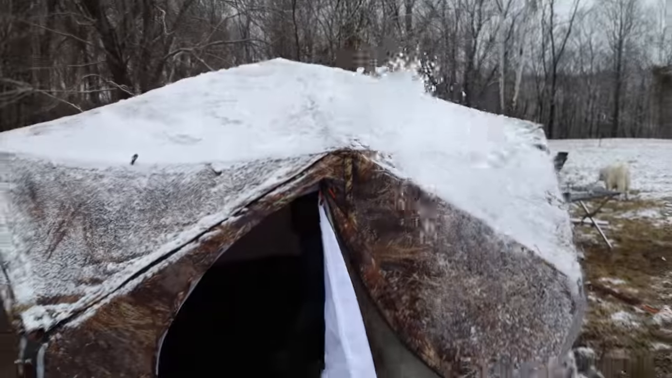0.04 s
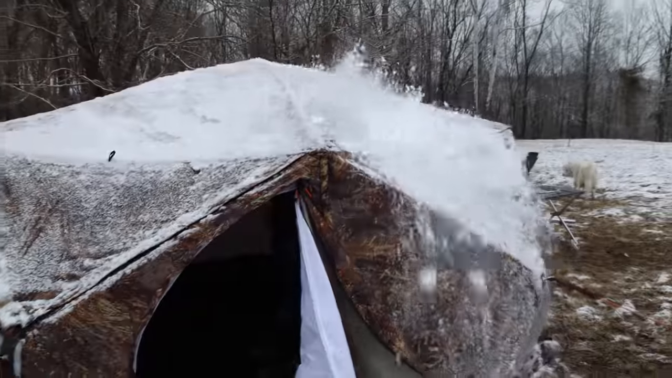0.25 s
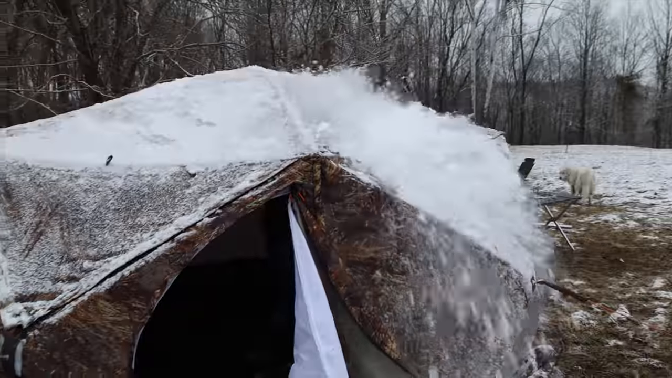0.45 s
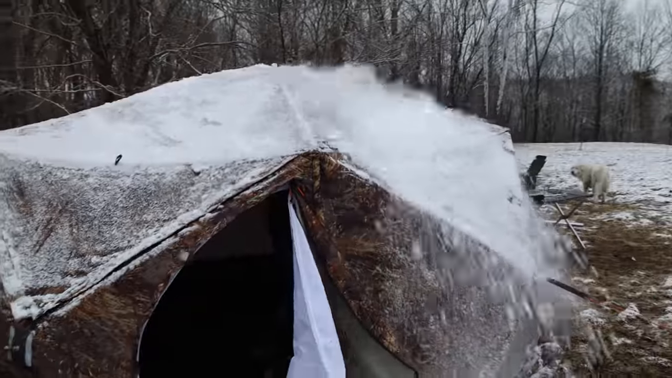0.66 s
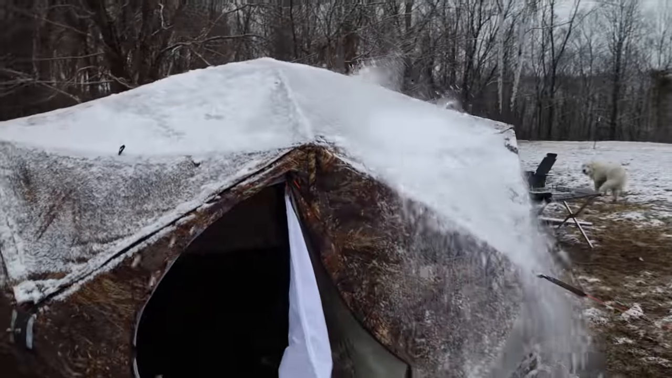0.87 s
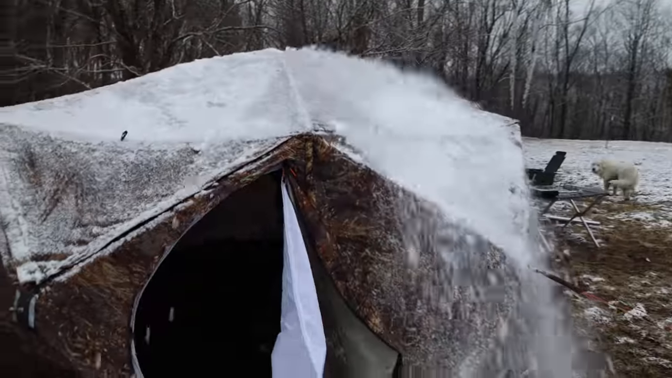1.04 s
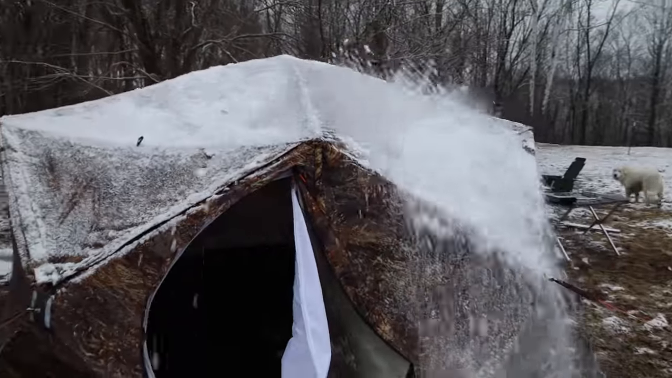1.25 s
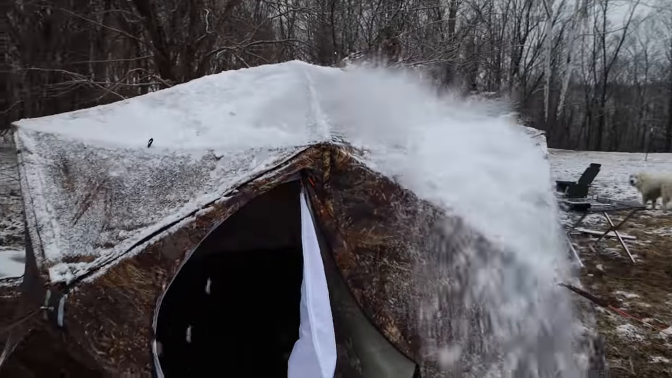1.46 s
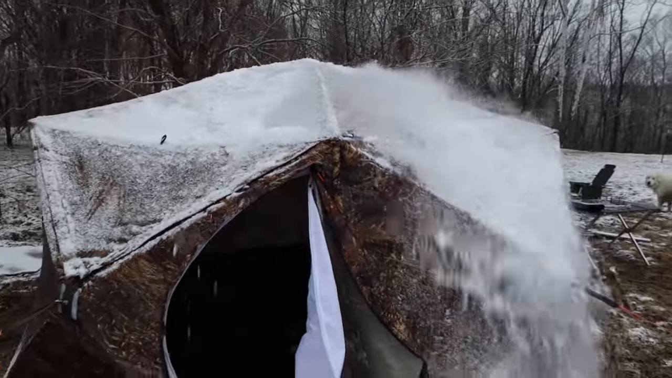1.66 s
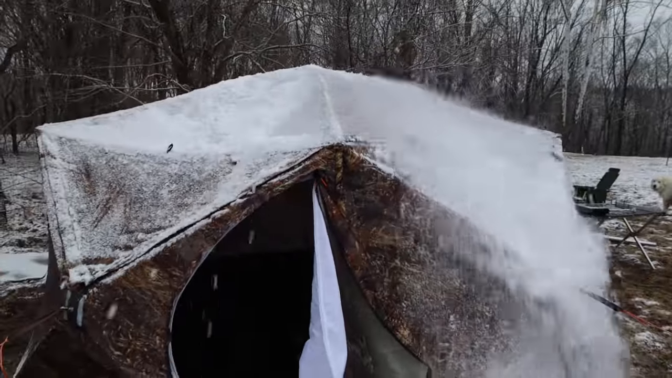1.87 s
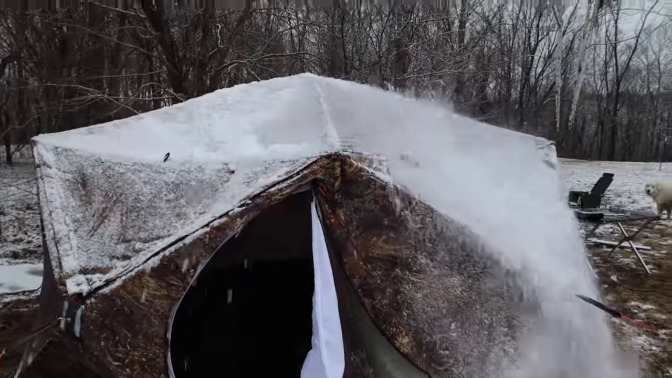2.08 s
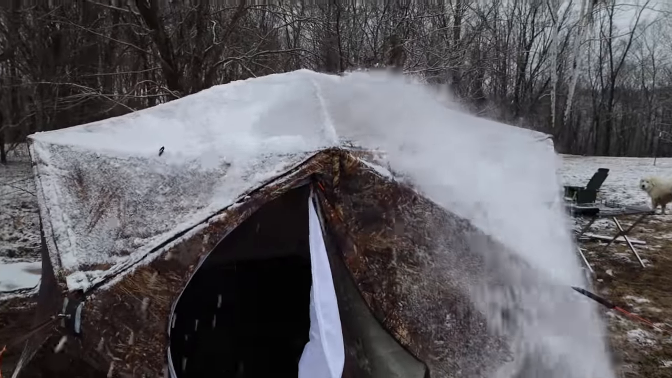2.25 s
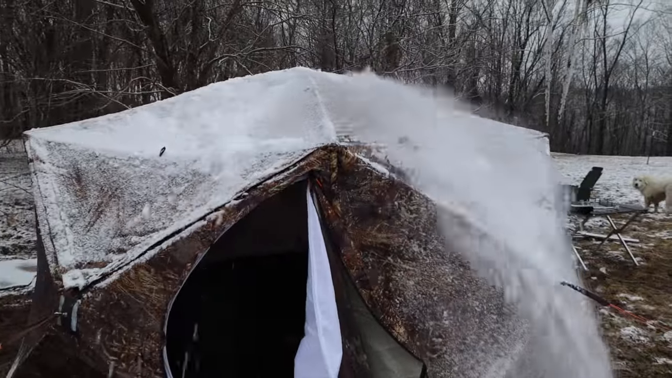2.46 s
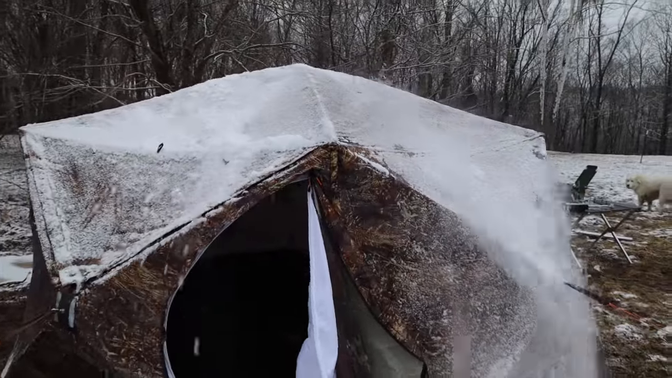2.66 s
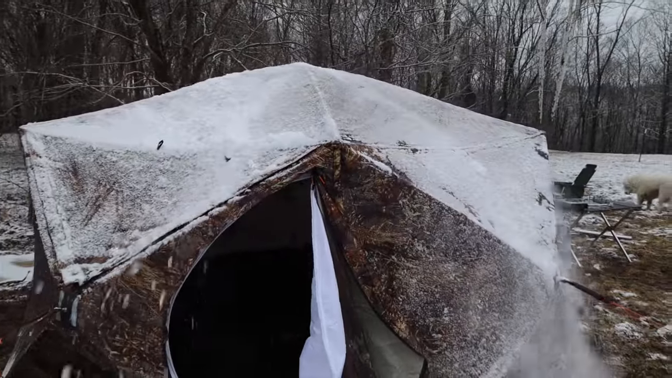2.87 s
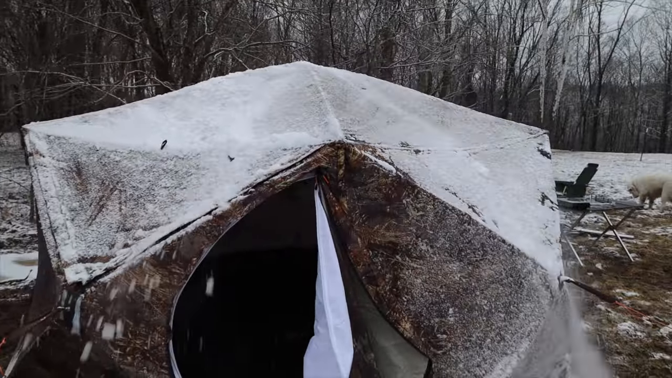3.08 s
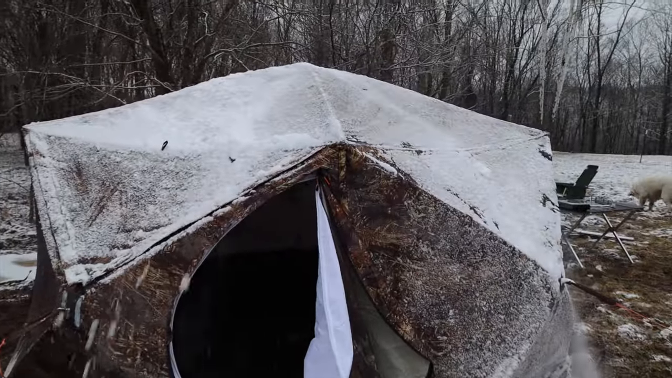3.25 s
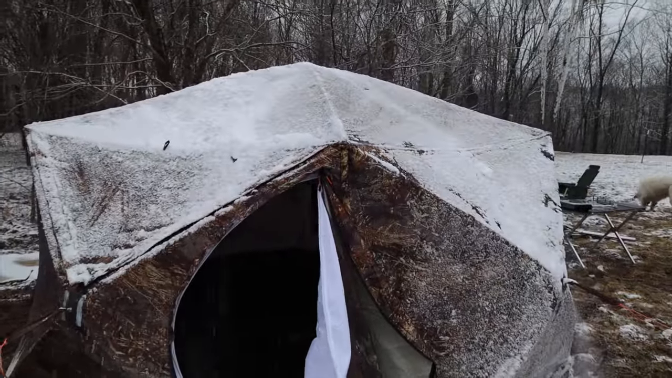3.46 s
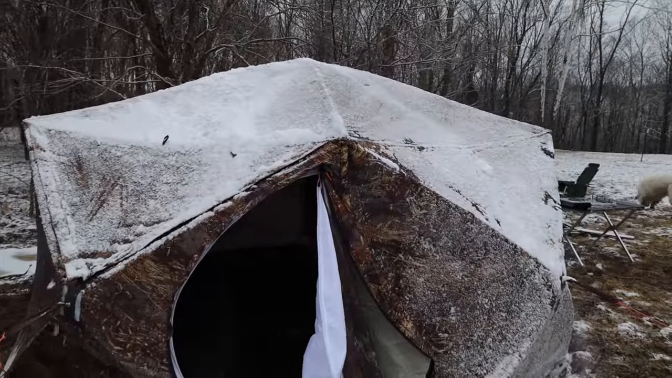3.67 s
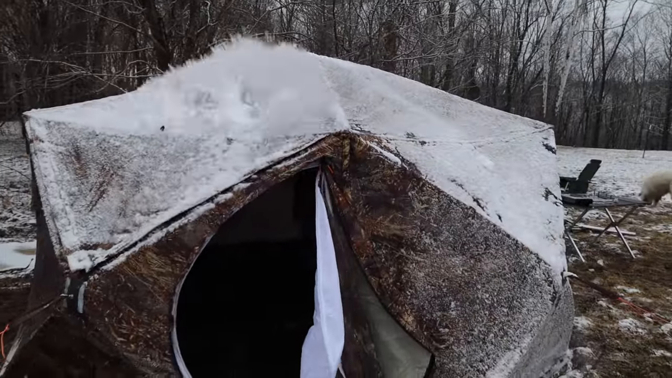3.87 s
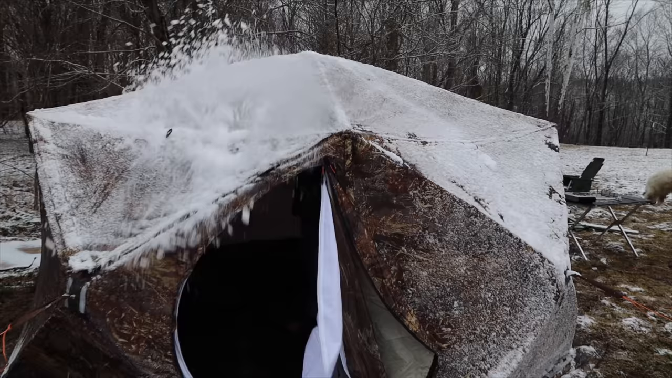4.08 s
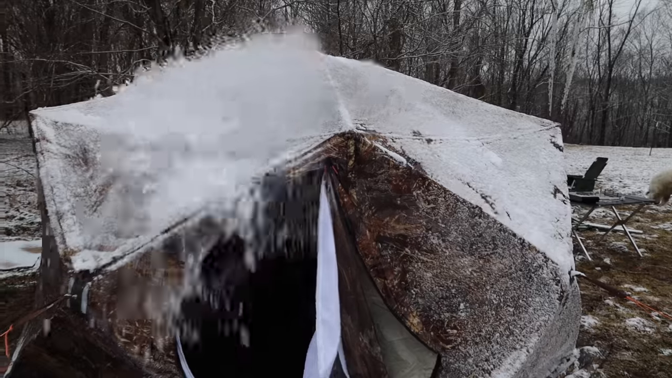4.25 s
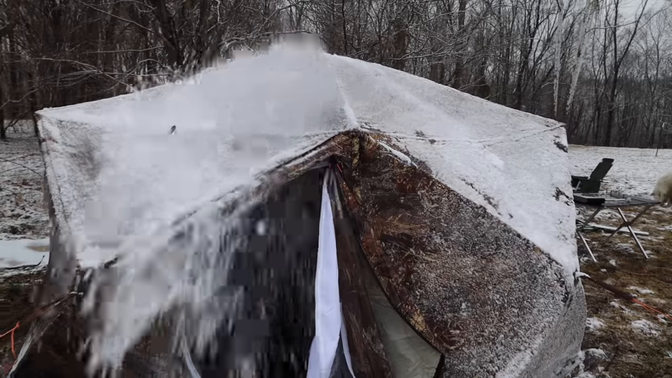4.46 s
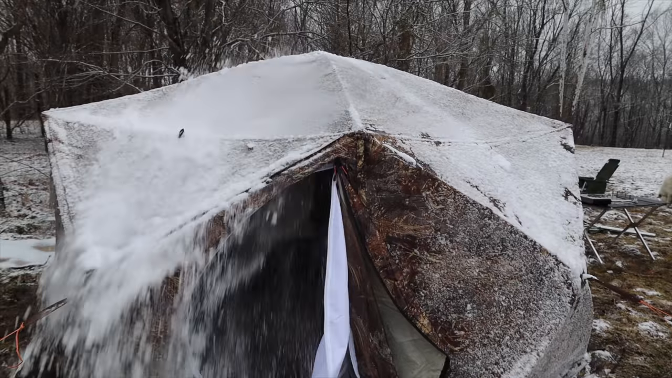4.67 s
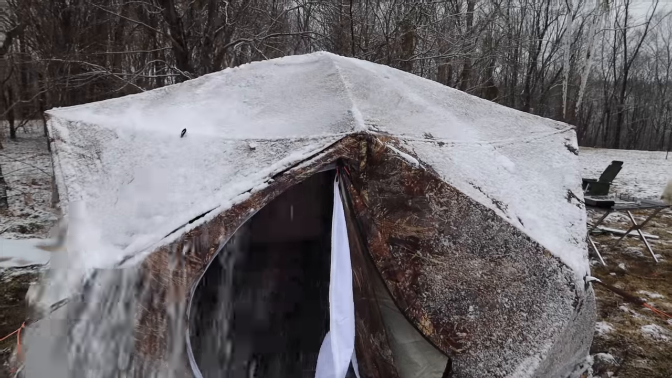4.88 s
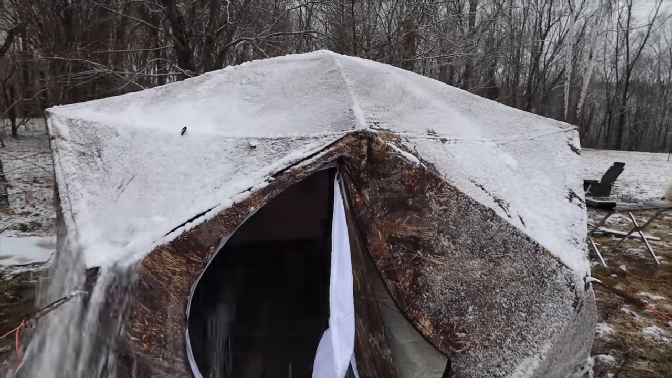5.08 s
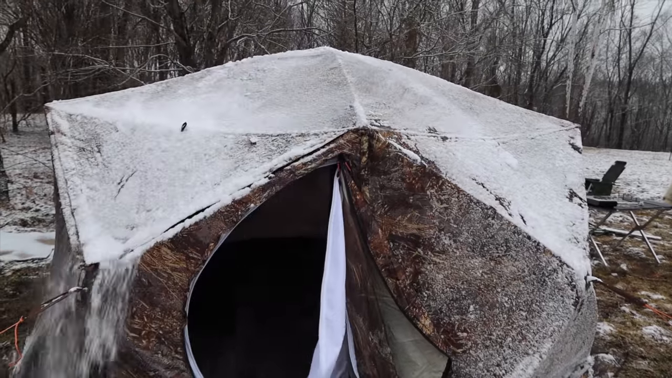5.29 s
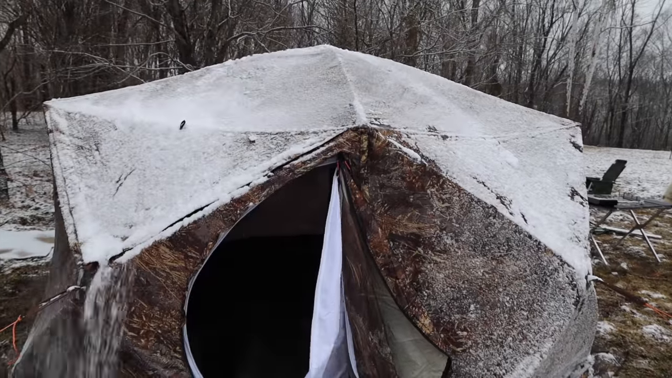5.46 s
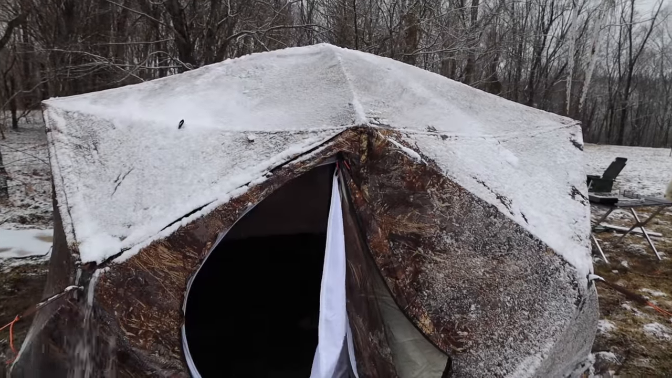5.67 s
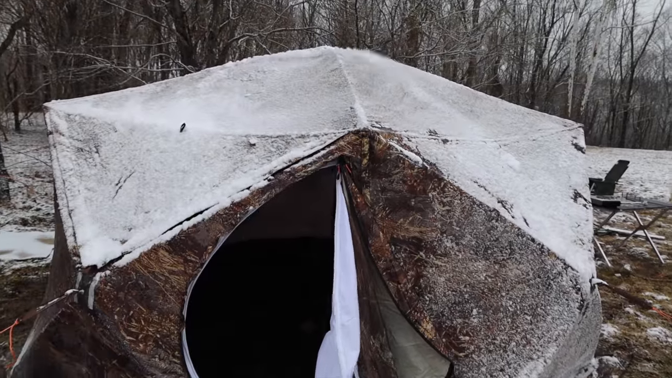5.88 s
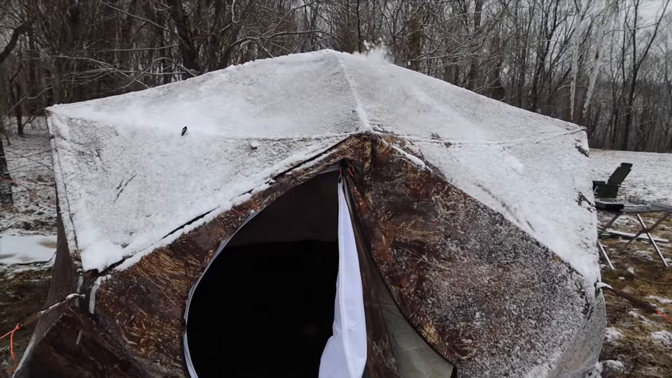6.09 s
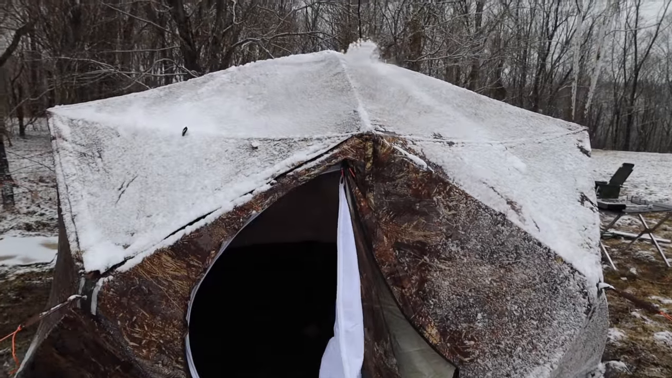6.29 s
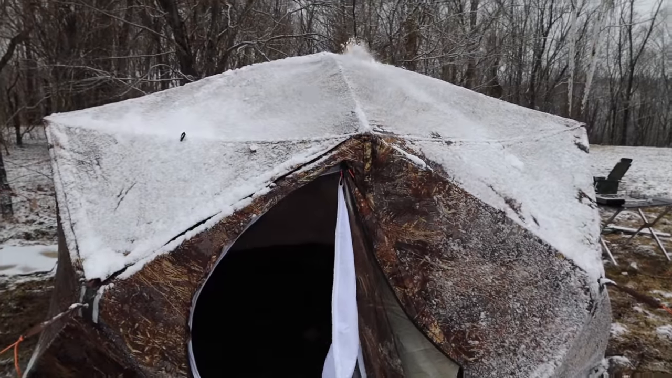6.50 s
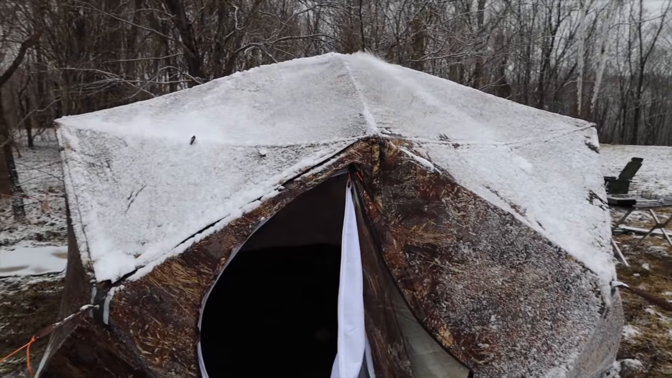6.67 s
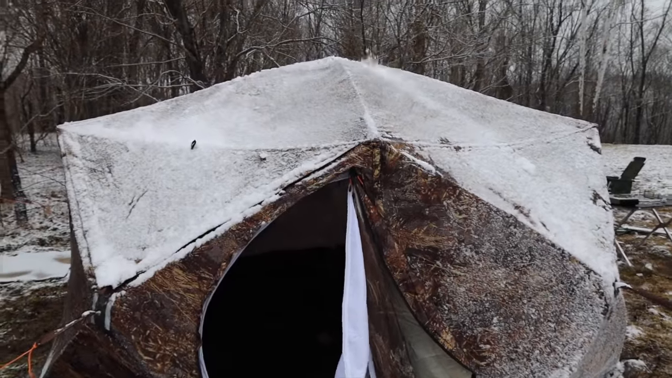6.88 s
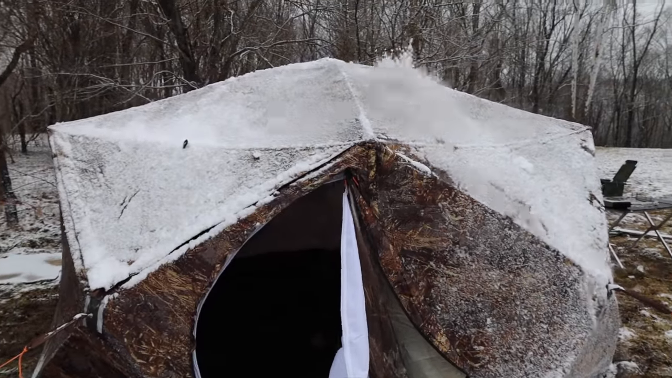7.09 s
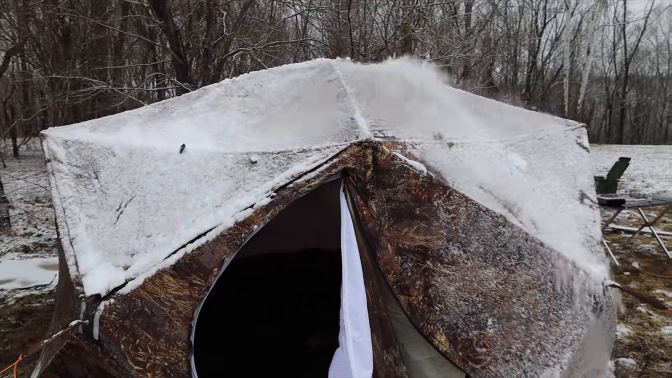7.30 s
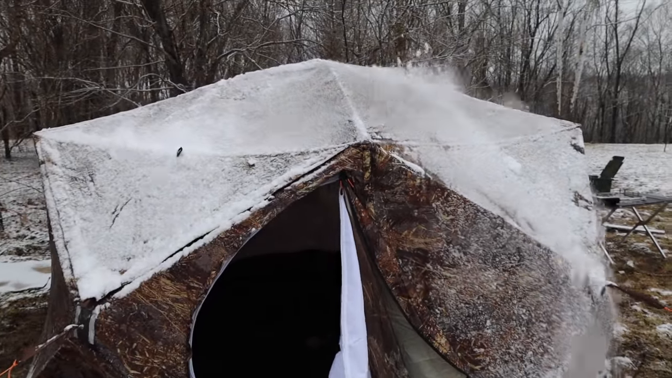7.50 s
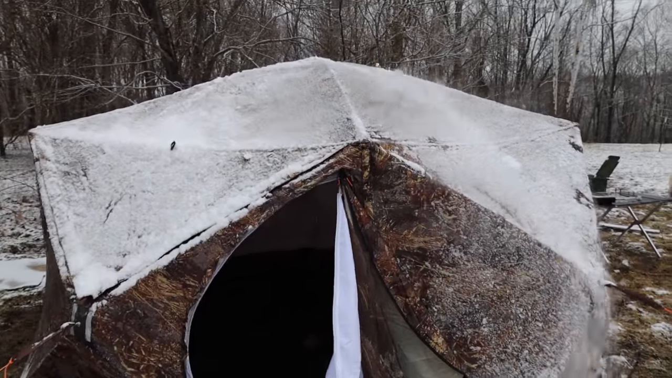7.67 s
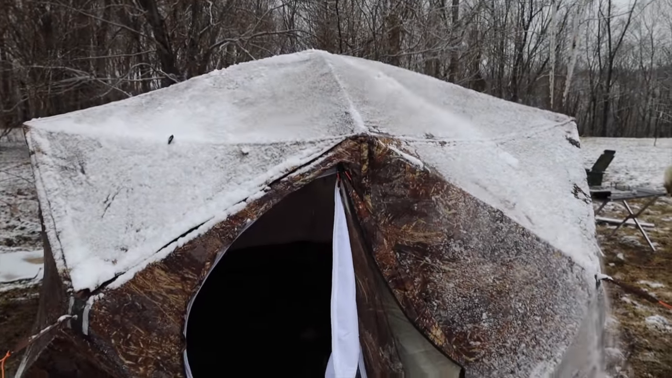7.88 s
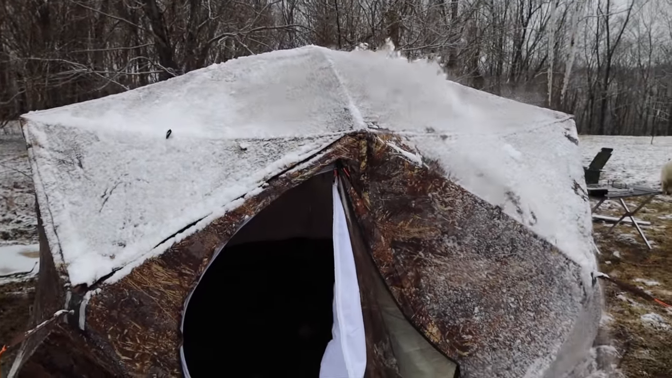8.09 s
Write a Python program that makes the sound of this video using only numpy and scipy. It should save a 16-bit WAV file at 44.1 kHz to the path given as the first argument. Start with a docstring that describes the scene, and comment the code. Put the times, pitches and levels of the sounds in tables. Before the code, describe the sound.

Dull, loud fabric thwacks with crisp crackling edges arrive roughly four per second, each followed by a looser flap. Between three groups of blows, sliding snow hisses and small clumps tap the sheet, some thuddy, some clicking. Very faint high tinkling and soft low wind surround the close, dry open-air sound, some slaps slightly overloaded.

```python
"""Slaps on a snowy tent roof

A hand slaps the roof of a heavy tent from inside, outdoors in winter, near the microphone. Each blow
cracks and flaps the frozen fabric: smacks and bursts of snaps, filtered by sheet, creases and air.
Snow patters and slides as filtered impulse trains; lumps land as damped sines with puffs of noise.
A thin high mode tinkles, and a light wind rumbles as low-passed noise.
"""
import sys
import numpy as np
from scipy import signal
from scipy.io import wavfile
from scipy.ndimage import uniform_filter1d

SR = 44100
rng = np.random.default_rng(int(sys.argv[2]) if len(sys.argv) > 2 else 0)


def unload_wav(signal):
    """Save mono or channel-first audio to the path in sys.argv[1] as 16-bit WAV at rate SR, clipped to [-1, 1]."""
    wavfile.write(
        sys.argv[1],
        SR,
        np.round(np.clip(np.atleast_2d(signal).T, -1, 1) * 32767).astype(np.int16),
    )


N = 358974

# Blows of the hand: (time [s], level [dB], crack [dB], push [dB], smack [dB], rise [s], hold [s],
# 60 dB fade [s]); crack, push and smack are relative to the level
BLOWS = [(0.092, -6, -13.5, -24, 6, .0044, 0.031, 0.33), (0.357, -5, -14.5, -23.5, 13, 0.0069, 0.016, .085),
         (0.639, -6, -14, -26, 8, 0.0026, 0.03, 0.44), (1.011, -6.5, -13, -23, -8, 0.028, 0.043, 0.38),
         (1.328, -6, -14.5, -17.5, 4, 0.003, 0.031, 0.22), (1.613, -5.5, -14.5, -18, 10, .007, .015, 0.39),
         (1.882, -6, -14, -22.5, 7, 0.0045, 0.016, 0.45), (2.173, -7, -14.5, -15, 8, 0.0032, 0.033, .21),
         (2.434, -9, -10.5, -17.5, 11, 0.0046, 0.022, 0.4), (3.828, -3.5, -13, -23, 6, 0.0028, .035, 0.13),
         (4.132, -3.5, -14, -17, -6, 0.0022, 0.014, 0.088),
         (4.415, -2.5, -15, -19, 13, 0.0029, 0.017, 0.17), (5.924, -7, -13, -21.5, -7, 0.0055, 0.024, 0.25),
         (6.198, -5, -16, -17, 6, 0.0061, 0.0092, 0.22), (6.43, -8, -13.5, -14, -6, 0.022, 0.019, 0.15),
         (6.694, -6.5, -14, -20.5, 1, .021, 0.011, 0.23), (6.986, -7.5, -14, -21, 15, 0.013, .064, 0.29),
         (7.22, -18.5, -8, -24, 7, 0.007, 0.016, .31), (7.276, -8, -11, -18, -1, 0.0086, 0.066, 0.27),
         (7.49, -10.5, -10, -25, 3, 0.052, 0.037, 0.27), (7.99, -14, -15.5, -12, 0, 0.0084, 0.023, 0.25),
         (8.02, -5.5, -14.5, -23.5, 8, 0.004, 0.045, 0.3)]
# Spectrum of hissing snow and bursting crumbs: (frequency [Hz], relative level [dB])
HISS_SPECTRUM = [(700, -0.5), (1400, -0.5), (2500, 2), (3300, 5.5), (4000, 0), (5500, -1), (7000, -8),
                 (9500, -14), (13000, -16)]


def slaps():
    """Impact excitation: a smack, then random snaps, drive the resonances of sheet, creases and air."""
    # Spectra of the stiff sheet, the cracking creases and the pushed air:
    # (frequency [Hz], relative level [dB])
    sheet_spectrum = [(90, -18.5), (160, -5), (250, 5), (570, -1), (910, 2), (1300, -5.5), (2000, -16),
                      (4000, -40)]
    crack_spectrum = [(700, -40), (1500, -2.5), (2200, -0.5), (2700, -2.5), (3250, -1.5), (3800, -7),
                      (5000, -8.5), (7100, -19.5), (13600, -24.5), (15800, -30)]
    push_spectrum = [(25, -7), (45, -8), (80, 0), (125, 0.5), (170, -18), (300, -17)]
    t = np.arange(N) / SR
    power, smacks = np.zeros((3, N)), np.zeros(N)
    for s, db, crack_db, push_db, smack_db, rise, hold, t60 in strokes():
        span = slice(round(s * SR), round((s + 1) * SR))
        age = t[span] - s
        smacks[round((s + rise) * SR)] = -amp(db + smack_db)  # full contact at the end of the rise
        # a hard smack sets off more intense snaps at first
        sting = 1 + amp(smack_db - 18.5) * np.exp(-age / 0.0051)
        # sheet, crack, push: (level [dB], added rise [s], fade time factor)
        layers = [(-7.0, 0, 1), (crack_db - 5.5, 0.006, 1.1), (push_db + 0.5, 0.004, 1.4)]
        for k, (layer_db, lag, slower) in enumerate(layers):
            fade_db = -60 * np.maximum(age - rise - hold, 0) / (t60 * slower)
            onset = np.clip(age / (rise + lag), 0, 1)
            power[k, span] += (onset * sting * amp(db + layer_db + fade_db)) ** 2
    sheet, crack, push = np.sqrt(power)
    # sheet and air share the same snaps; the creases add finer ones
    snaps = steadied(patter(per_s=2500, spread_db=1.0), seconds=0.014)
    creases = crack * (0.69 * snaps + 1.29 * patter(per_s=14000, spread_db=-1.0))
    sheet_sound = colour(sheet * wrinkled(snaps, depth_db=3.0) + smacks, sheet_spectrum)
    air_sound = colour(push * snaps, push_spectrum)
    crack_sound = colour(creases + amp(-7.5) * smacks, crack_spectrum)
    return sheet_sound + air_sound + crack_sound


def strokes():
    """Forced and free motion: the blows, the sheet's rebounds and its rustles, all in the columns of BLOWS."""
    # The sheet flaps back after a blow: (time [s], level [dB], hold [s], 60 dB fade [s])
    rebound_rows = [(0.361, -10, 0.053, 0.36), (0.501, -18, 0.0092, 0.1), (1.368, -6, 0.018, 0.32),
                    (1.664, -12.5, .025, 0.16), (1.947, -11.5, 0.012, 0.19), (2.226, -7, 0.017, .27),
                    (2.479, -10, 0.048, 0.16), (2.717, -22, 0.038, 0.24), (3.887, -13, 0.032, 0.26),
                    (4.147, -5, .0091, 0.047), (4.185, -22.5, 0.031, 0.3), (4.485, -15.5, 0.016, 0.27),
                    (5.992, -19.5, 0.038, 0.15), (6.162, -20.5, 0.0043, 0.033), (6.282, -19.5, 0.03, 0.19),
                    (6.494, -15.5, .011, 0.34), (6.784, -25, 0.06, 0.36), (7.093, -17, .028, 0.14),
                    (7.372, -11.5, 0.029, .18), (7.593, -15, 0.043, .17), (8.066, -12.5, 0.02, .27)]
    # Bright rustles of the fabric: (time [s], level [dB], hold [s])
    rustle_rows = [(3.283, -26.5, 0.046), (3.49, -29, 0.02), (4.651, -24.5, 0.035), (7.862, -30, .01)]
    movements = list(BLOWS)
    for s, db, hold, t60 in rebound_rows:
        crack_db = -16.5 - 0.25 * db  # softer rebounds sound brighter
        push_db = -41.5 - db  # the same push whatever the level
        movements.append((s, db, crack_db, push_db, 3, 0.0098, hold, t60))
    for s, db, hold in rustle_rows:
        movements.append((s, db, -2.8, -33, 0, 0.017, hold, 0.16))
    return movements


def wrinkled(x, depth_db):
    """Time-varying resonance: slack fabric changes shape, so its response varies in small patches."""
    z = signal.stft(x, nperseg=1024, noverlap=768)[2]
    noise = rng.standard_normal(z.T.shape)  # (time frame, frequency bin)
    over_time = uniform_filter1d(noise, size=5, axis=0)
    patches = evened(uniform_filter1d(over_time, size=3, axis=1)).T
    gain = amp(depth_db * patches)
    gain = gain / np.sqrt(np.mean(gain ** 2))
    return signal.istft(z * gain, nperseg=1024, noverlap=768)[1][:N]


def lumps():
    """Damped oscillation: each lump dents the sheet with a short ring and bursts into a puff of crumbs."""
    # Landings: (time [s], ring level [dB], pitch [Hz], crumbs relative to the ring level [dB])
    landings = [(0.257, -20, 3000, -8), (0.514, -9, 991, -8.5), (0.596, -13, 3490, -4),
                (0.617, -7, 3080, -12), (1.602, -6.5, 2500, -13), (2.821, -18, 2470, -8),
                (2.924, -14, 3350, -13), (3.113, -9, 2840, -15), (3.126, -13, 3430, -14),
                (3.187, -18, 3280, -8), (3.23, -10.5, 2430, -13), (3.449, -5, 3080, -17),
                (3.519, -10, 960, -21), (3.568, -20, 2990, -7), (3.608, -22, 3490, -4),
                (3.649, -17.5, 875, -8), (3.712, -13, 2820, -14), (3.73, -15, 2070, -16),
                (3.755, -23, 3390, -16), (3.98, -10, 980, -10), (4.313, -1, 890, -16),
                (4.63, -7, 2910, -12), (4.68, -14, 830, -4.5), (4.735, -8.5, 1700, -12),
                (4.883, -6.5, 3750, -17), (4.978, -9.5, 2840, -10), (4.995, -4, 3180, -13),
                (5.004, -10, 915, -7), (5.068, -9, 960, -17), (5.13, -9.5, 3080, -4.5),
                (5.303, -9, 890, -10), (5.37, -12, 3220, -10), (5.407, -13.5, 3360, -9),
                (5.515, -7.5, 3710, -18), (5.618, -14, 776, -9), (5.721, -13, 850, -16),
                (6.329, -14, 851, -8.5), (7.809, -6.5, 2980, -14), (7.884, -13, 900, -9),
                (7.923, -14, 835, -5.5)]
    rings, puffs = np.zeros(N + SR), np.zeros(N + SR)
    t = np.arange(600) / SR
    crumbs = rng.standard_normal((len(landings), len(t)))
    for (s, db, hz, puff_db), puff in zip(landings, crumbs):
        cycles = 1.64 * (hz / 3000) ** 0.5  # low-pitched lumps die out in fewer cycles
        envelope = (1 - np.exp(-t * hz / 0.45)) * np.exp(-t * hz / cycles)
        start = round(s * SR)
        rings[start:][:len(t)] += -amp(db) * np.sin(2 * np.pi * hz * t) * envelope
        puffs[start:][:len(t)] += amp(db + puff_db) * puff * np.exp(-t / 0.0027)
    return rings[:N] + colour(puffs, HISS_SPECTRUM)


def slide():
    """Granular friction: snow hisses in spurts, crumbs tick, powder sprays and the sheet drums."""
    # Sliding snow: (time [s], hiss level [dB], drumming level [dB])
    slide_levels = [(0.0, -29, -28.5), (0.6, -30, -32), (1.2, -31, -31.5), (2.3, -34, -29.5),
                    (2.55, -33.5, -27), (2.81, -33.5, -36), (3.42, -37, -41.5), (3.84, -42.5, -43.5),
                    (3.97, -30, -28.5), (4.35, -30.5, -26), (4.71, -30.5, -38.5), (5.08, -27.5, -34.5),
                    (5.3, -30, -41), (5.53, -30.5, -43.5), (5.93, -41.5, -42.5), (6.05, -34.5, -32),
                    (6.94, -35, -34), (7.35, -33, -25), (7.84, -34, -31), (8.14, -38, -40)]
    # Spectra of drumming, sliding powder and thrown powder: (frequency [Hz], relative level [dB])
    drum_spectrum = [(60, -2.5), (150, -2), (300, 3.5), (500, 0.5), (900, 1.5), (1300, -6), (2500, -14.5)]
    dust_spectrum = [(5000, -20), (7500, 2.5), (11000, -0.5), (13300, 2.5), (15800, -4)]
    spray_spectrum = [(5000, -20), (8000, -2), (11000, 4), (13300, 6.5), (15800, 1)]
    hiss_db = curve(slide_levels, axis=1)
    flow = amp(hiss_db)
    spurts = flow * flutter(seconds=0.012, depth_db=0.5)
    hiss = colour(spurts * patter(per_s=16000, spread_db=2.0), HISS_SPECTRUM)
    drumming = amp(curve(slide_levels, axis=2)) * flutter(seconds=0.035, depth_db=2.0)
    drum = colour(drumming * patter(per_s=3000, spread_db=1.0), drum_spectrum)
    fine = amp(-43.5 + 0.8 * (hiss_db + 29.5))  # powder follows the hiss by 0.8 dB per dB
    specks = patter(per_s=18000, spread_db=2.0)
    thrown = np.sqrt(after_blows(db=-35, delay=0.044, t60=0.6))
    # the specks in reverse order serve for the thrown powder
    powder = colour(fine * specks, dust_spectrum) + colour(thrown * specks[::-1], spray_spectrum)
    return hiss + powder + amp(-10.0) * flow * grains() + drum


def grains():
    """Short resonances: icy crumbs tick for a few cycles at twelve pitches."""
    t, out = np.arange(300) / SR, np.zeros(N)
    for hz in np.geomspace(1300, 7000, 12):
        tick = np.sin(2 * np.pi * hz * t) * np.exp(-t * hz / 1.45)
        tick = tick / np.linalg.norm(tick)
        out += signal.oaconvolve(patter(per_s=40, spread_db=3.0), tick)[:N]
    return evened(out)


def tinkle():
    """Lightly damped resonance: sparse taps, stronger after each blow, ring one very high mode."""
    # The mode: (frequency [Hz], bandwidth [Hz])
    hz, width = (14700, 60)
    t = np.arange(2000) / SR
    ring = np.sin(2 * np.pi * hz * t) * np.exp(-np.pi * width * t)
    rest_power = amp(-74.0) ** 2
    shaken = np.sqrt(rest_power + after_blows(db=-51.0, delay=0.13, t60=2.0))
    taps = shaken * flutter(seconds=0.13, depth_db=7.0) * patter(per_s=160, spread_db=1.0)
    return signal.oaconvolve(taps, ring / np.linalg.norm(ring))[:N]


def wind():
    """Turbulent pressure: low-frequency noise swells and sinks at the microphone."""
    # Wind: (time [s], level [dB])
    wind_levels = [(0.0, -38), (1.16, -47), (2.45, -53), (2.79, -47), (3.74, -57), (3.99, -39), (4.71, -52),
                   (5.17, -45), (5.67, -62), (6.1, -44), (6.51, -37), (6.71, -41), (8.14, -46)]
    # Spectrum of the rumble: (frequency [Hz], relative level [dB])
    gust_spectrum = [(12, -20), (28, -9), (60, -19), (150, -16), (400, -40)]
    return colour(amp(curve(wind_levels, axis=1)) * rng.standard_normal(N), gust_spectrum)


def after_blows(db, delay, t60):
    """Superposed decays: power each blow sets off, swelling over the delay [s] as it fades by 60 dB in t60 [s]."""
    t, power = np.arange(N) / SR, np.zeros(N)
    for s, blow_db, *_ in BLOWS:
        age = np.maximum(t - s, 0)
        swell = np.minimum(age / delay, 1)
        power += (swell * amp(db + blow_db - 60 * age / t60)) ** 2
    return power


def patter(per_s, spread_db):
    """Shot noise: a random train of tiny impacts at rms 1; a positive spread makes a few stand out."""
    struck = rng.random(N) < per_s / SR
    size = np.minimum(rng.exponential(1, N), 5)
    return evened(rng.standard_normal(N) * amp(spread_db * size) * struck)


def flutter(seconds, depth_db):
    """Random amplitude modulation: a gain throbs irregularly with smoothed noise."""
    return amp(depth_db * evened(uniform_filter1d(rng.standard_normal(N), round(seconds * SR))))


def steadied(x, seconds):
    """Power normalisation: keeps the grain of x but evens its power over short spans."""
    return x / np.sqrt(uniform_filter1d(x ** 2, round(seconds * SR)) + 1e-3)


def colour(x, points, size=8192):
    """Minimum-phase filtering: shapes x to a spectrum, keeping white noise at its rms."""
    hz, db = np.transpose(points)
    log_f = np.log(np.abs(np.fft.fftfreq(size, 1 / SR)) + 1)
    log_gain = np.log(amp(np.interp(log_f, np.log(hz + 1), db, left=-60, right=-70)))
    # the Hilbert transform of the log gain gives the phase of a causal response
    taps = np.fft.ifft(np.exp(np.conj(signal.hilbert(log_gain)))).real[:size // 2]
    return signal.oaconvolve(x, taps / np.linalg.norm(taps))[:N]


def curve(rows, axis):
    """Linear interpolation: one column of a table, joined over time."""
    table = np.transpose(rows)
    return np.interp(np.arange(N) / SR, table[0], table[axis])


def evened(x):
    """Root-mean-square normalisation: scales x to rms 1."""
    return x / np.sqrt(np.mean(x ** 2) + 1e-20)


def amp(db):
    """Logarithmic level: decibels to amplitude gain."""
    return 10 ** (np.asarray(db) / 20)


def scene():
    """Superposition: all sources add in the open air, with no reflections."""
    return (slaps() + lumps() + slide() + tinkle() + wind())[None]


def record(dry):
    """Saturation and band limit: peaks beyond full scale flatten, then a low-pass trims the top."""
    flattened = np.clip(dry, -1, 1)
    edge_hz = 15790
    low_pass = signal.firwin(1023, edge_hz, window=("kaiser", 10), fs=SR)
    return signal.oaconvolve(flattened, low_pass[None], "same")


dry = scene()
out = record(dry)
unload_wav(out)
```